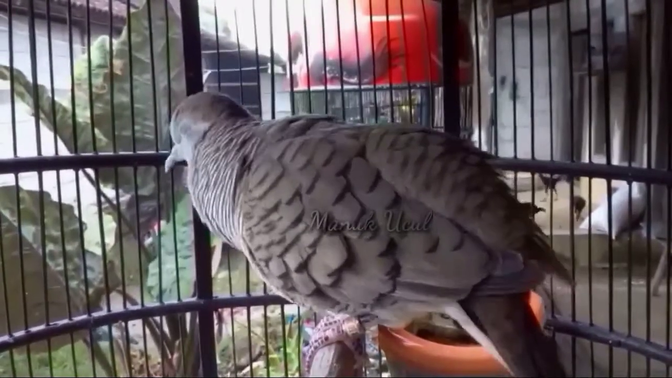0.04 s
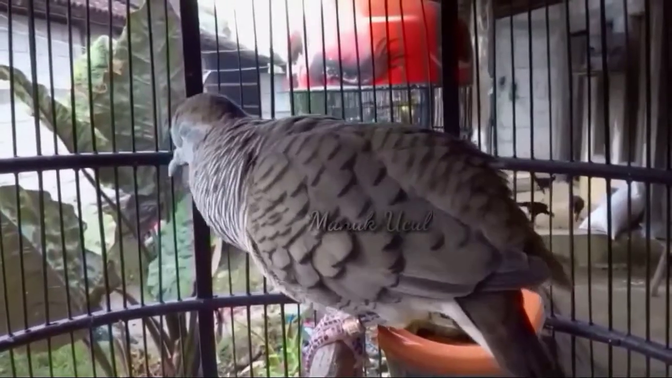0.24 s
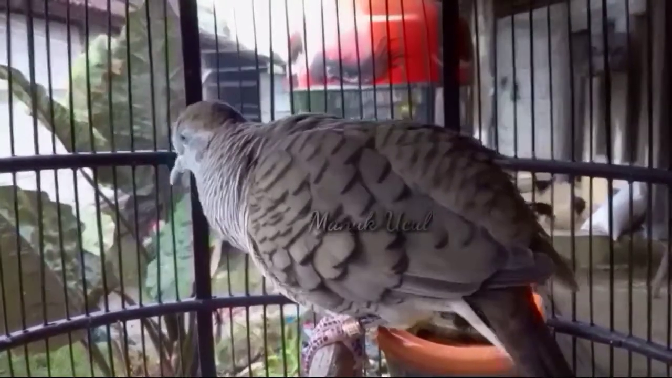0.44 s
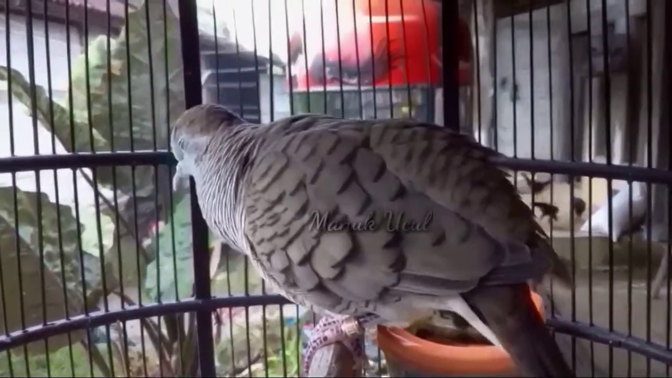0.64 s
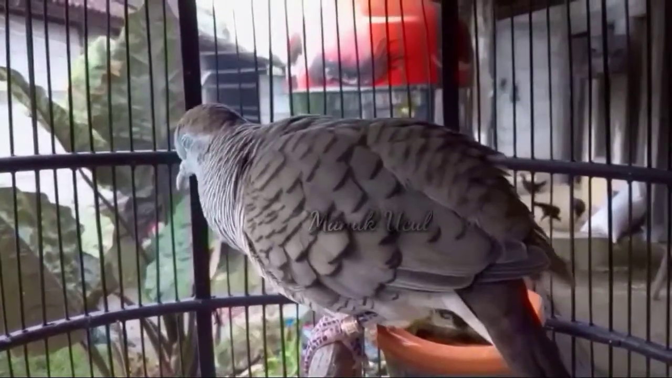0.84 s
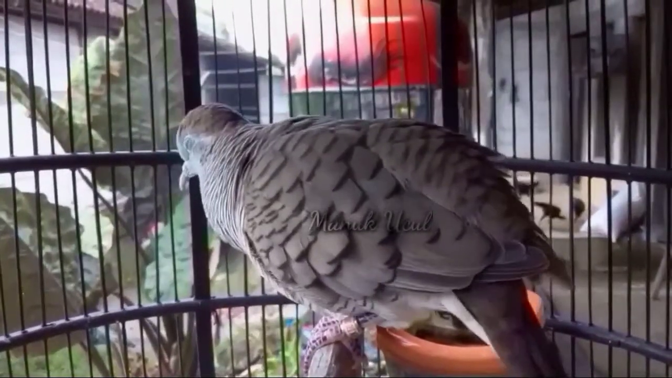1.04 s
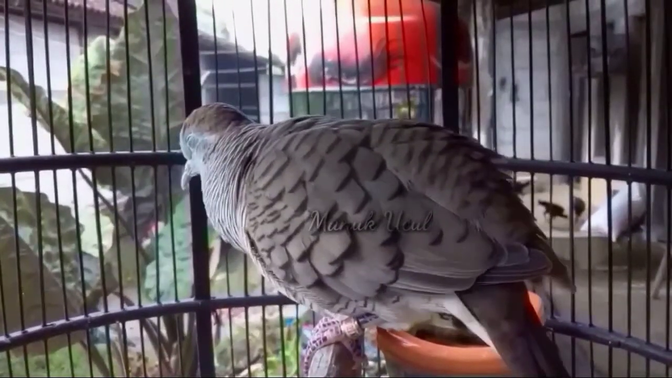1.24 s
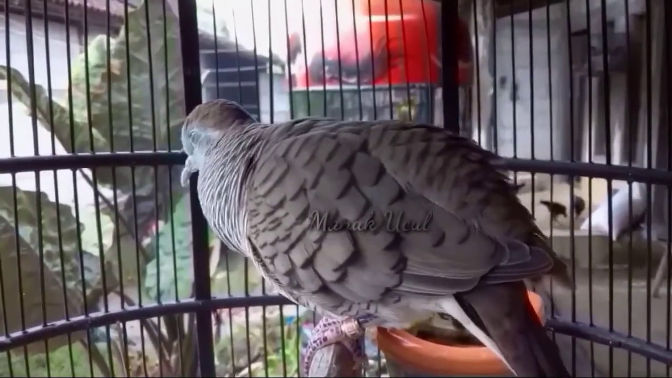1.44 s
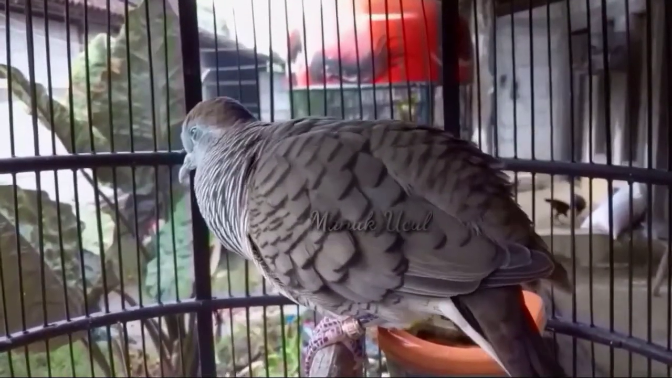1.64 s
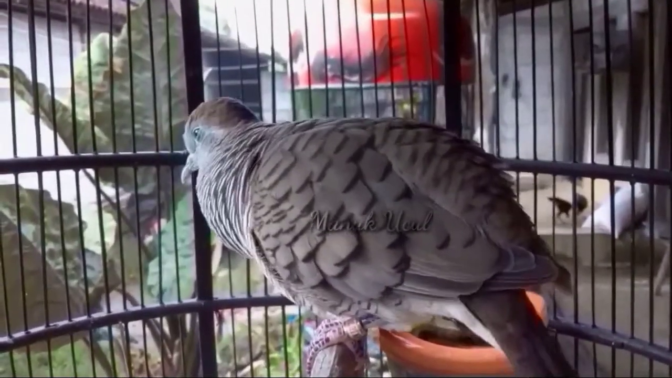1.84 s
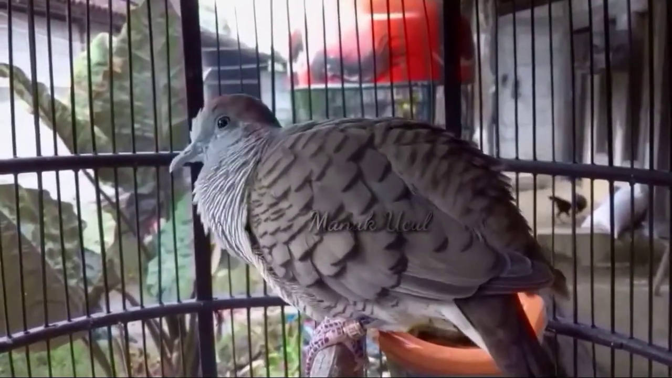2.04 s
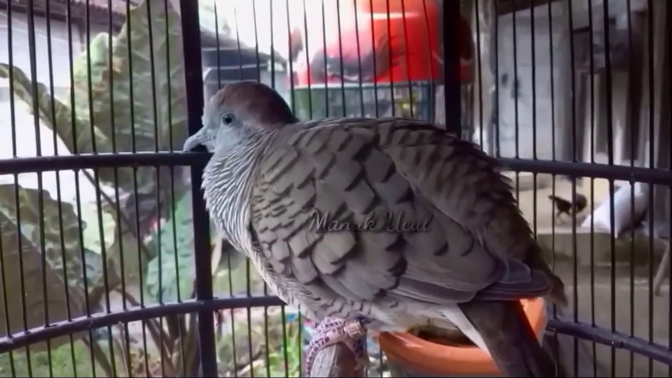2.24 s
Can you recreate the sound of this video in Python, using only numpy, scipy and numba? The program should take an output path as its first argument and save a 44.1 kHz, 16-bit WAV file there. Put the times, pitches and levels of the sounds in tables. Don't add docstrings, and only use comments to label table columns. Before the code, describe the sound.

A caged dove coos one phrase close to a phone microphone. Low yard rumble, insect hiss, tiny cage ticks and a far dove open. At 0.2 s a throaty croak leads into a loud, slightly clipped note, breaking upward until 0.5 s. Four short, smooth hoots follow at 0.73, 0.93, 1.13 and 1.34 s, then a long sagging coo from 1.57 to 2.03 s. Distant chirps and faint echo remain.

```python
import sys
import numpy as np
from scipy import signal
from scipy.io import wavfile
from scipy.ndimage import uniform_filter1d
from numba import njit

SR = 44100
rng = np.random.default_rng(int(sys.argv[2]) if len(sys.argv) > 2 else 0)


def generate_wav(sig):
    pcm = np.round(np.clip(np.atleast_2d(sig).T, -1, 1) * 32767).astype(np.int16)
    wavfile.write(sys.argv[1], SR, pcm)


def how_loud(loudness_db):
    steps = np.asarray(loudness_db, float) / 20
    return 10 ** steps


N = 101430


def level(x, db):
    return x * how_loud(db) / np.sqrt(np.mean(x ** 2))


@njit
def svf(x, hz, width):
    y, b, l = np.empty(len(x)), 0., 0.
    for i in range(len(x)):
        g, k = np.tan(np.pi * hz[i] / SR), width / hz[i]
        v = (b + g * (x[i] - l)) / (1 + g * (g + k))
        b, l, y[i] = 2 * v - b, l + 2 * g * v, k * v
    return y


def band(hz, width):
    centre_hz = hz + np.zeros(N)
    once = svf(rng.standard_normal(N), centre_hz, 1. * width)
    return level(svf(once, centre_hz, 1. * width), 0)


def walk(rate):
    k = int(SR / rate)
    steps = np.repeat(rng.standard_normal(N // k + 1), k)
    return 1.546 * uniform_filter1d(uniform_filter1d(steps, k), k)[:N]


def logf(table, hz):
    points = np.array(table)
    return np.interp(np.log(hz), np.log(points[:, 0]), points[:, 1])


def hump(t, start, length, edge):
    to_nearest_end = np.minimum(t - start, start + length - t)
    return np.sin(np.pi / 2 * np.clip(to_nearest_end / edge, 0, 1)) ** 2


def yard():
    # pitch_hz, density_db (per Hz)
    yard_spectrum = [(28, -19), (60, 2.5), (130, 0), (200, -10), (600, -16.5), (1300, -21), (2000, -27),
                     (15000, -46)]
    # pitch_hz, width_hz, level_db
    insects = [
        (4750, 1200, -70),
        (10440, 3900, -71),
        (138.9, 10, -59.5),
    ]
    air, swell = 0, walk(0.5)
    for hz in 30 * 2 ** np.arange(0, 9.1, .5):
        band_db = logf(yard_spectrum, hz) + 10 * np.log10(hz)
        flicker_db = .8 * swell + 1.2 * walk(12)
        air = air + how_loud(band_db + flicker_db) * band(hz, hz / 2)
    air = level(air, -51)
    return air + sum(how_loud(db + 0.88 * walk(4)) * band(hz, width) for hz, width, db in insects)


def cage_ticks(t):
    # start_s, level_db
    taps = [
        (.048, -47),
        (.056, -49),
        (.064, -49),
        (.152, -44),
        (.157, -45),
        (.272, -32),
    ]
    decay_s = 0.00096
    strike = sum(how_loud(db) * (t > s) * np.exp(-np.abs(t - s) / decay_s) for s, db in taps)
    return strike * band(8000, 12000)


def far_chirps(t):
    # start_s, length_s, level_db, from_hz, to_hz, width_hz
    calls = [(.06, .1, -54, 1750, 2050, 400), (.09, .07, -52, 950, 1250, 120),
             (.66, .2, -60, 3600, 2900, 500), (.96, .12, -61, 3300, 3200, 500),
             (.98, .25, -63, 1540, 1530, 20), (1.15, .1, -63, 4500, 4000, 700),
             (1.17, .35, -55, 300, 345, 20), (1.2, .16, -59, 3500, 2900, 500),
             (1.38, .12, -68, 2600, 2600, 60), (1.5, .58, -57, 330, 330, 300),
             (1.64, .18, -62, 4800, 2400, 350), (1.8, .22, -63, 1750, 1740, 20),
             (1.8, .25, -68, 3900, 3700, 150), (1.8, .16, -68, 4800, 4800, 350),
             (2.03, .17, -66, 4950, 4750, 300), (2.13, .08, -65, 2150, 1950, 300),
             (2.14, .08, -59, 980, 960, 150), (2.19, .12, -66, 3200, 2700, 900)]
    out = 0
    for start, length, db, from_hz, to_hz, width in calls:
        glide_hz = np.interp(t, [start, start + length], [from_hz, to_hz])
        out = out + how_loud(db + 1.54) * hump(t, start, length, length / 3) * band(glide_hz, width)
    return out


def far_dove(t):
    # start_s, length_s, level_db, pitch_hz
    far_notes = [
        (.125, .11, -43, 1300),
        (.29, 0.02, -56.5, 1290),
        (.44, 0.17, -54, 1290),
        (.655, 0.11, -44.5, 1269),
        (0.843, 0.14, -44.5, 1289),
        (1.114, 0.13, -45, 1290),
        (1.376, 0.14, -48, 1290),
        (1.649, 0.11, -41.5, 1290),
        (1.929, 0.084, -39, 1297),
        (2.21, 0.095, -43, 1294),
    ]
    rise_hz, rise_s = 92.5, .03
    song = 0
    for start, length, db, hz in far_notes:
        pitch_hz = hz - rise_hz * np.exp(-(t - start).clip(0) / rise_s)
        tone = np.sin(2 * np.pi * np.cumsum(pitch_hz) / SR)
        song = song + how_loud(db) * hump(t, start, length, 0.035) * tone
    return 1.26 * song * how_loud(0.83 * walk(30))


def croaks(t):
    # start_s, level_db, length_s
    openings = [
        (.196, -12, .019),
        (.727, -18, .011),
        (.925, -20, .01),
        (1.127, -25, .009),
        (1.336, -27, .008),
        (1.565, -24, .013),
    ]
    pulse_hz, ring_hz, low_ring_hz, width_hz = 350, 1045, 450, 330
    pulses, chance = np.zeros(N), rng.standard_normal((len(openings), 2, 12))
    for (start, db, length), (uneven_time, uneven_level) in zip(openings, chance):
        at = np.cumsum((1 + 0.1 * uneven_time) / pulse_hz) - 1 / pulse_hz
        growth = np.clip(.5 + at / length, 0, 1) * (at < length)
        np.add.at(pulses, ((start + at) * SR).astype(int), growth * how_loud(db + 0.5 * uneven_level))

    def ring_thrice(hz):
        x = pulses
        for _ in range(3):
            x = svf(x, np.full(N, 1. * hz), 1. * width_hz)
        return x

    return (ring_thrice(ring_hz) + how_loud(-15.5) * ring_thrice(low_ring_hz)) * SR / width_hz / 2


def short_note(start, length, hz, db):
    start_sag_hz, start_sag_s, end_sag_hz, end_sag_s = 110, .015, 120, .011
    swell_db, release_s, release_db = 12, .017, 22
    s = np.linspace(0, length, num=40)
    pitch_hz = hz - start_sag_hz * np.exp(-s / start_sag_s) - end_sag_hz * np.exp((s - length) / end_sag_s)
    swell = swell_db * (1 - s / (length - release_s)).clip(0) ** 1.8
    release = release_db * np.clip(1 - (length - s) / release_s, 0, 1) ** 2
    return np.c_[start + s, pitch_hz, db - swell - release]


def dove(t):
    # time_s, pitch_hz, level_db
    climb = [
        (.209, 750, -24),
        (.216, 775, -11.5),
        (.23, 793, -9.5),
        (.244, 815, -6),
        (.255, 820, -6.5),
        (.2625, 875, -4.2),
        (.2645, 895, -8.5),
        (.2708, 915, -13),
    ]
    # time_s, pitch_hz, level_db
    broken_up = [
        (.272, 1000, -1.8),
        (.287, 1043, -.7),
        (.318, 1036, -3.2),
        (.385, 1013, -4.6),
        (.458, 972, -9),
        (.474, 957, -5),
        (.499, 920, -7.5),
        (.503, 840, -15),
        (.509, 760, -30),
    ]
    # start_s, length_s, top_pitch_hz, level_db
    short_notes = [
        (0.735, .056, 853.3, -7.5),
        (0.933, 0.06, 842.6, -7),
        (1.134, 0.066, 838.8, -7.5),
        (1.34, 0.081, 821, -6.5),
    ]
    # time_s, pitch_hz, level_db
    last_note = [
        (1.573, 730, -28),
        (1.583, 770, -15),
        (1.607, 804, -9),
        (1.66, 796, -6),
        (1.76, 779, -8),
        (1.92, 758, -13),
        (2.008, 759, -14.5),
        (2.023, 758, -18),
        (2.034, 720, -40),
    ]
    # pitch_hz, level_db
    throat = [(1500, -42), (2400, -44), (3200, -61), (4400, -70), (5500, -58), (6500, -68), (8500, -78),
              (11000, -90)]
    notes = [np.vstack([climb, broken_up])] + [short_note(*n) for n in short_notes] + [np.array(last_note)]
    rows = np.vstack(notes)
    hz = uniform_filter1d(np.interp(t, rows[:, 0], rows[:, 1]), size=50) * (1 + .003 * walk(60))
    spans = [(n[0, 0], n[-1, 0]) for n in notes]
    gate = sum(hump(t, a - .003, b - a + .006, .007) for a, b in spans)
    bright_s, bright_db, pressed_db = .038, 25, 13
    fresh = sum((t > a) * np.exp(-np.abs(t - a) / bright_s) for a, _ in spans)
    note_db = uniform_filter1d(np.interp(t, rows[:, 0], rows[:, 2]), size=50)
    envelope = gate * 2 ** .5 * how_loud(note_db + .6 * walk(95))
    phase = 2 * np.pi * np.cumsum(hz) / SR
    tone = np.sin(phase) + how_loud(-33.5) * band(889, 190)
    tone += how_loud(-51) * fresh * band(3700, 5000)
    pressed = np.clip((hz - 850) / 100, 0, 1)
    for k in range(2, 14):
        lift_db = (bright_db * fresh + pressed_db * pressed) * np.clip((k - 3) / 3, 0, 1)
        flicker_db = 3. * min((k - 1) / 4, 1) * walk(90)
        tone += how_loud(logf(throat, k * hz) + lift_db + flicker_db) * np.sin(k * phase + k)
    return envelope * tone


def yard_echo(t, near, far):
    # late_s, level_db
    walls = [
        (.014, -24),
        (.047, -31),
    ]
    t60_s, gap_s = 0.35, 0.016
    tail = rng.standard_normal(SR) * how_loud(-60 * t[:SR] / t60_s) * (t[:SR] > gap_s)
    tail /= np.sqrt(np.sum(tail ** 2))
    wet = signal.fftconvolve(how_loud(-22.5) * near + how_loud(-6) * far, tail)[:N]
    return wet + sum(how_loud(db) * np.roll(near, int(s * SR)) for s, db in walls)


def scene():
    t = np.arange(N) / SR
    near = dove(t) + croaks(t)
    far = far_dove(t) + far_chirps(t) + cage_ticks(t)
    duck_db, duck_at_s, duck_s = 8.5, 0.21, 0.22
    gain = how_loud(duck_db * np.exp(-(t - duck_at_s).clip(0) / duck_s))
    return (near + far + yard_echo(t, near, far) + gain * yard())[None]


def top_cut(x):
    return signal.sosfilt(signal.butter(12, 15670, fs=SR, output="sos"), x)


def record(dry):
    return top_cut(np.clip(dry, -.95, .95))


dry = scene()
out = record(dry)
generate_wav(out)
```